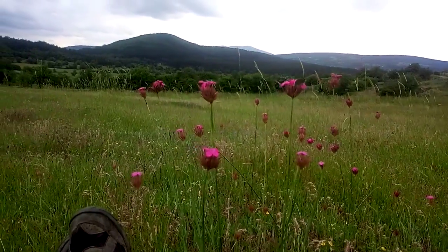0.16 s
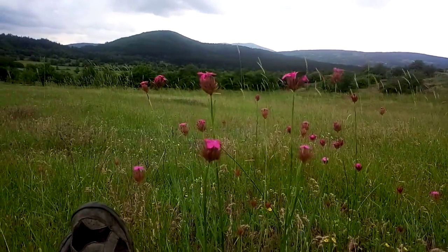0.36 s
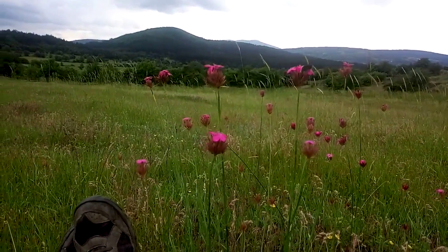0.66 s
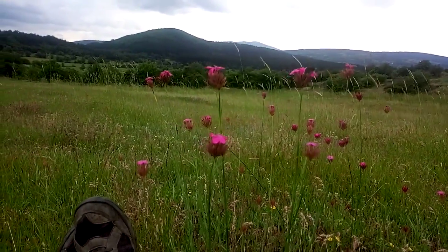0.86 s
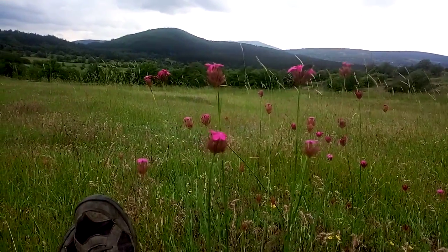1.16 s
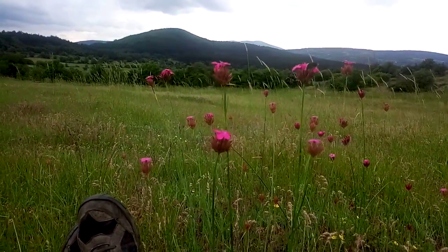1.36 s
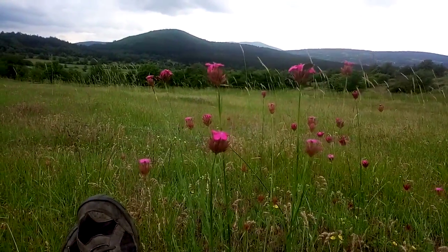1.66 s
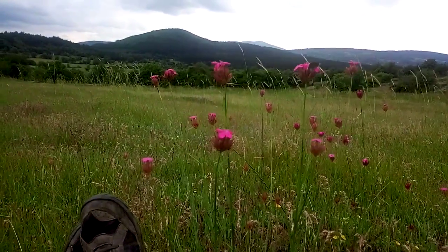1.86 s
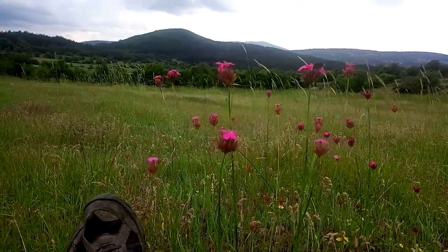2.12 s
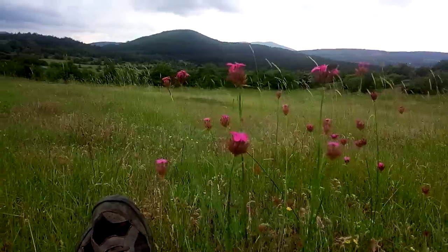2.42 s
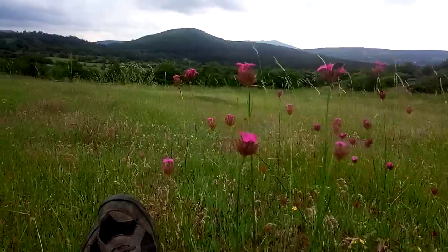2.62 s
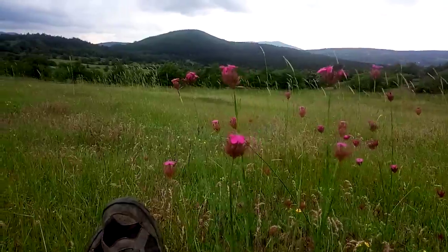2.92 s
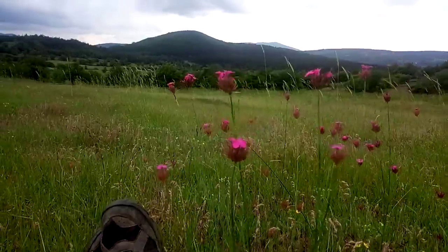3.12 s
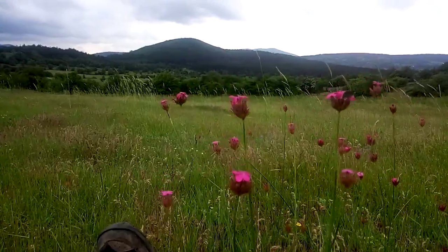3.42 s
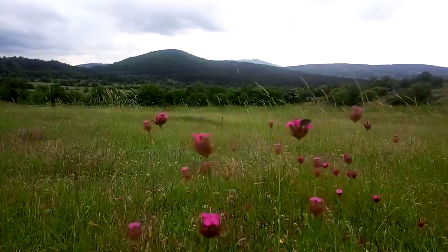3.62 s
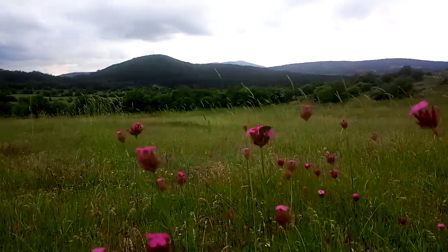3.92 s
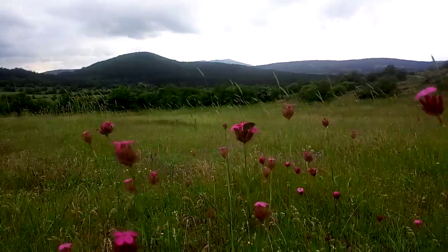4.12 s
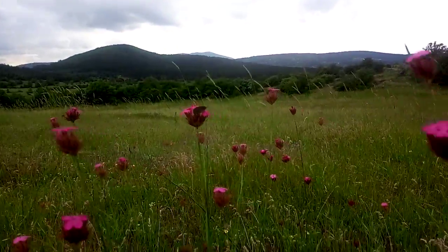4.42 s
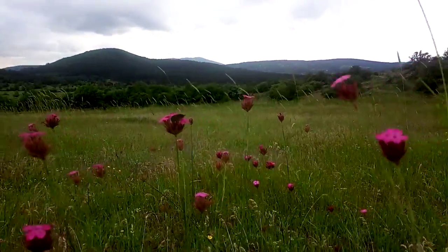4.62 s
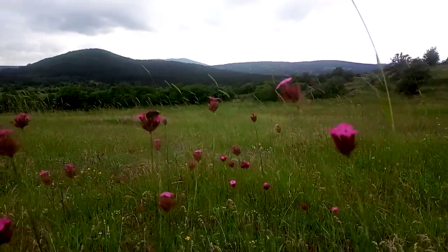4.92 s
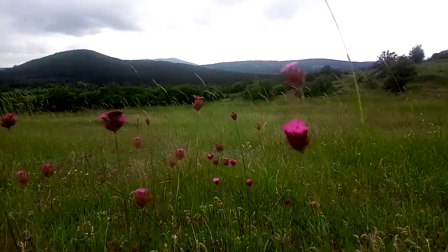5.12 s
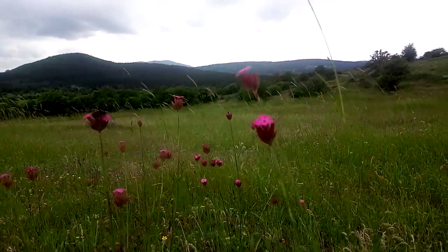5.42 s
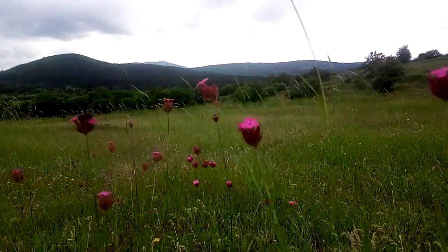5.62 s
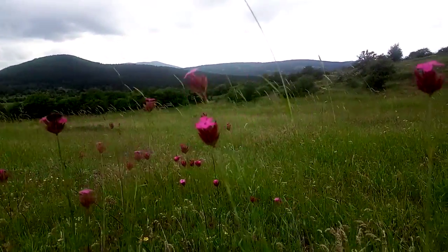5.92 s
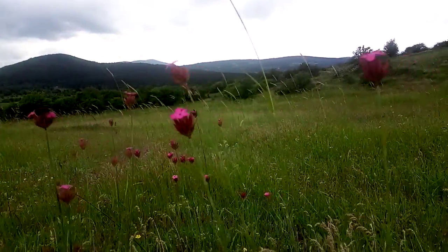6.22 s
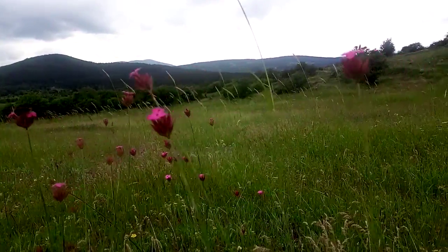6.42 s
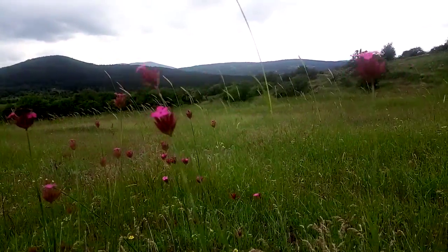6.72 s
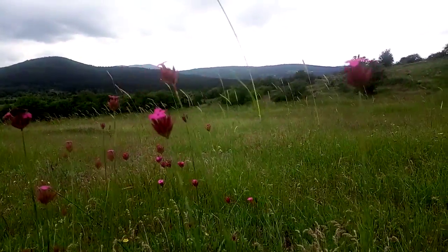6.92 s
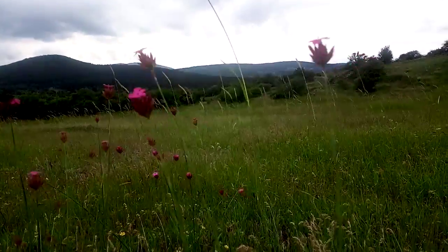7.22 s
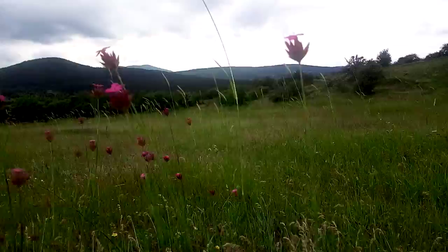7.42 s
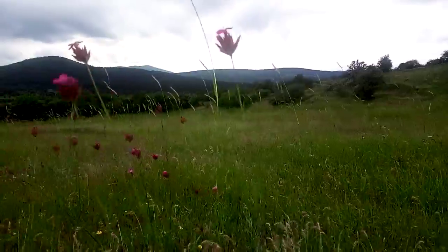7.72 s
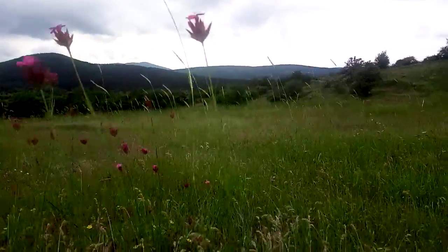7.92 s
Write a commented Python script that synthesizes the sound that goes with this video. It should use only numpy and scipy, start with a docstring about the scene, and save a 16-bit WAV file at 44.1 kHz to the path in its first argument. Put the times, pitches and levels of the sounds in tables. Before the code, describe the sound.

Breezy grassland with crickets throughout, near chirps swelling toward the end. Small birds slide and twitter at varied distances. A bright, buzzing songbird verse comes early and again late, each closing on a lower rattling trill. Between them, deep wind buffets hit the unprotected microphone, with thin high ticks alongside. Later the wind is weaker but grass rustles more. Dry open air, slight scattered echo, faint hiss.

```python
"""A meadow on a breezy day. Crickets pulse near and far throughout: arched tones, one for each wing stroke.
Early on a farther bird calls in level notes and slurs; then a bunting sings its first verse of buzzy rises, dipping
whistles and a trill, all throbbing sines. Gusts of shaped noise rumble on the microphone as a high bird ticks.
After that a near bird calls in quick drops and hooks. Late in the scene the bunting sings a second verse while the
grass, a brighter noise, rustles more. Other birds slide and twitter all along, over a soft hiss."""
import sys
import numpy as np
from scipy import signal
from scipy.io import wavfile
from scipy.ndimage import uniform_filter1d

SR = 44100
rng = np.random.default_rng(int(sys.argv[2]) if len(sys.argv) > 2 else 0)


def persist_wave(psi):
    """Save psi, clipped to +-1, as 16-bit WAV."""
    counts = np.round(np.clip(psi, -1, 1) * 32767).astype(np.int16)
    wavfile.write(sys.argv[1], SR, np.atleast_2d(counts).T)


N = 355446

# bunting, buzzy rising notes: (top t/s, climb t/s, top f/Hz, buzz level/dB, top level/dB)
BUNTING_RISES = [(1.614, .045, 4000, -54, -61), (1.814, 0.047, 3830, -44.5, -36),
                 (2.004, 0.064, 3812, -45.5, -36), (2.198, 0.074, 3810, -46.5, -40),
                 (2.369, 0.065, 3820, -43.5, -38.5), (6.111, 0.05, 3950, -54, -61.5),
                 (6.319, .062, 3870, -44, -36), (6.516, 0.06, 3866, -40, -35.5),
                 (6.709, 0.075, 3846, -46, -43.5), (6.88, 0.063, 3800, -45.5, -39)]
CLIMB_HZ_PER_S = 5700
RISE_ATTACK_S, RISE_ATTACK_DB = .026, -25.5  # time to set in; start against the buzz
SURGE_S, TOP_HOLD_S = 0.025, 0.0038  # the level leaves the buzz this early; top held this long on either side
RISE_DROP_S, RISE_DROP_DB = .018, -13  # time after the top, level against the top
RISE_RELEASE_S, RISE_RELEASE_DB = .034, -18  # the same for the end of the note
# bunting, whistles that drop to the peak and turn up again: (peak t/s, f/Hz, peak level/dB, size of the dip f/Hz)
BUNTING_DIPS = [(1.65, 4250, -56, 93), (1.872, 4450, -41.5, 326), (2.07, 4425, -42.5, 240),
                (2.255, 4410, -46.5, 328), (2.424, 4383, -41.5, 232), (6.165, 4300, -56.5, 60),
                (6.38, 4410, -47.5, 180), (6.575, 4450, -51, 119.6), (6.76, 4450, -55, 149),
                (6.948, 4376, -48, 150)]
# course shared by the dipping whistles: (t/s from peak, share of the dip, level/dB against peak)
DIP_SHAPE = [(-.038, 0.67, -22.5), (-.018, 0.22, -3.5), (0, -0.45, 2.5), (.016, -.25, -3),
             (.032, 0.56, -14)]
# bunting, trills: (start t/s, peak t/s, end t/s, f/Hz, peak level/dB, drift of f/Hz, drift of level/dB)
BUNTING_TRILLS = [(2.49, 2.647, 2.87, 3269, -47.5, 9.2, 0), (6.999, 7.117, 7.32, 3248, -39, 25, 2.3)]
TRILL_ATTACK_S, TRILL_DRIFTS_PER_S = 0.041, 37.6
TRILL_START_DB, TRILL_SWELL_DB, TRILL_FADE_DB = -12, -4, -23  # start, after the attack, end: against the peak
RISE_BUZZ_HZ, TRILL_BUZZ_HZ = 161.8, 119  # the voice throbs this often

# a farther bird of the same kind, a level note and a slur down: (slur t/s, note level/dB, slur level/dB, slur f/Hz)
FAR_ANSWERS = [(.645, -80, -59, 3800), (.9, -83, -64, 3600), (1.206, -63.5, -51.5, 3976),
               (1.496, -54.5, -44, 4040), (1.723, -55.5, -49.5, 4030), (1.94, -54.5, -48.5, 4040)]
# its level note: (t/s from slur, f/Hz, level/dB against the note)
ANSWER_NOTE_SHAPE = [(-.128, 3530, -7), (-.105, 3530, -1), (-.055, 3520, 0), (-.036, 3500, -7)]
# its slur: (t/s from slur, shift f/Hz, level/dB against the slur)
ANSWER_SLUR_SHAPE = [(-.026, 196.5, -7.5), (0, 1.5, -3.5), (.026, -170, -12.5)]
# a near bird, a quick drop and an upward hook: (start t/s, drop level/dB, hook level/dB, shift of hook f/Hz)
NEAR_HOOKS = [(4.25, -43.5, -41, 86), (4.336, -40.5, -40.5, 5), (4.423, -38.5, -41.5, -22)]
# its drop: (t/s from start, f/Hz, level/dB against the drop)
DROP_SHAPE = [(0, 3500, -1), (.005, 2530, -5.5), (.012, 1960, -4)]
# its hook: (t/s from start, f/Hz before the shift, level/dB against the hook)
HOOK_SHAPE = [(.017, 1780, -7.5), (.03, 2296, -1.5), (.045, 2590, 0.5)]
# short arched calls: (top t/s, top f/Hz, level/dB)
ARCHED_CALLS = [(7.47, 2560, -44), (7.577, 2530, -45), (7.685, 2474, -41.5)]
# course of an arched call: (t/s from top, shift f/Hz, level/dB against the call)
ARCH_SHAPE = [(-.014, -670, -8), (-.005, -230, -7.5), (0, 1, 0), (.005, -240, -6.5), (.012, -660, 5)]
# calls heard once, each with a course of its own: (t/s, f/Hz, level/dB)
SOLO_CALLS = [
    [(3.425, 4050, -60), (3.445, 4630, -74), (3.465, 3530, -55.5), (3.49, 3510, -56)],
    [(3.998, 2444, -46), (4.012, 3030, -46.5), (4.024, 4360, -76), (4.034, 2920, -47), (4.048, 1810, -43.5)],
    [(6.89, 2420, -62.5), (6.915, 2894, -55.5), (6.95, 2780, -56), (6.975, 2490, -50), (7.0, 2364, -56.5),
     (7.02, 2430, -57.5)],
    [(7.742, 4390, -52), (7.755, 2770, -62.5), (7.77, 4240, -51), (7.78, 4120, -52), (7.8, 4010, -46)],
]
# single slides of birds all around:
# (start t/s, length t/s, from f/Hz, to f/Hz, bend: under 1 moves early, level/dB)
BIRD_SLIDES = [(.075, 0.023, 2470, 2420, 1.1, -72), (0.151, .018, 2110, 2000, .9, -70),
               (0.403, 0.027, 3820, 2940, 1, -71), (.65, 0.17, 2180, 2120, 1, -82),
               (.67, .02, 3440, 2930, 1.1, -72), (0.779, 0.023, 3160, 3120, 1, -70),
               (1.227, 0.036, 3580, 3080, 1.2, -65.5), (1.617, 0.03, 2260, 2540, 0.38, -72),
               (1.666, 0.034, 3540, 2940, 1.1, -66.5), (1.93, .075, 2860, 2540, .6, -76.5),
               (1.977, 0.058, 2060, 2030, 0.63, -77), (2.054, 0.37, 3310, 3230, 0.97, -68.5),
               (2.408, 0.081, 2650, 2510, 0.48, -69), (2.645, 0.0084, 2060, 2500, 1.1, -61.5),
               (2.88, 0.025, 2800, 2570, 0.51, -68), (3.403, 0.11, 2590, 2380, 0.52, -74),
               (3.709, 0.039, 1920, 2694, 0.794, -49), (3.824, 0.011, 7000, 5030, 1, -62),
               (3.954, 0.011, 7740, 5360, 1.3, -64.5), (4.699, .025, 2350, 1950, 1.2, -70),
               (5.135, 0.018, 4200, 3270, 1.1, -74), (5.612, 0.04, 3200, 4330, 1.3, -79),
               (5.686, 0.027, 3400, 4200, 1.3, -75), (5.707, 0.032, 5430, 5300, 1.1, -63.5),
               (6.4, 0.078, 3320, 3030, 0.44, -67.5), (7.273, .01, 4300, 3620, 1.1, -63),
               (7.379, .23, 3230, 3270, .9, -69), (7.401, .17, 2960, 2980, .9, -71.5),
               (7.41, 0.018, 4400, 3480, 1.1, -81), (7.645, .015, 3850, 3380, 0.95, -68),
               (8.016, .035, 3230, 3100, .9, -81)]
SLIDE_ENDS_DB = -5.5  # how much softer a slide starts and ends
# calls that leap to a sharp peak and trail off: (peak t/s, trail t/s, trail ends at f/Hz, level/dB)
PEAKED_CALLS = [(2.864, 0.038, 2940, -57), (3.227, 0.043, 3070, -55), (3.7, .045, 2930, -65),
                (4.371, 0.075, 2900, -58), (4.796, 0.042, 2900, -55.5), (5.006, 0.035, 2770, -61),
                (5.414, 0.061, 2830, -69), (5.9, .055, 2900, -71)]
# the leap they share: (t/s from peak, f/Hz, level/dB against the call)
LEAP_SHAPE = [(-.032, 2630, -11), (-.014, 2520, -6.5), (-.006, 3380, -9.5), (0, 4400, -13),
              (.006, 3450, -4), (.012, 3220, -2)]
TRAIL_DB = -10.5  # end of the trail against the call
# swoops that slide fast and then settle: (start t/s, length t/s, from f/Hz, to f/Hz, level/dB)
BIRD_SWOOPS = [(.444, 0.08, 2010, 3150, -69.5), (0.937, .1, 2890, 1970, -77.5),
               (0.991, 0.095, 2220, 3400, -67.5), (1.106, 0.051, 2280, 2970, -71.5),
               (1.243, 0.042, 5400, 6170, -74), (7.351, 0.037, 4730, 2930, -55)]
SWOOP_SETTLE = .2  # share of the length in which the distance to the goal shrinks to about a third
SWOOP_END_DB = -7  # fading at the end

# a high thin bird ticking: (t/s, peak level/dB, middle of the slide f/Hz)
HIGH_TICKS = [(2.7352, -58.5, 7050), (2.9215, -54.5, 7290), (3.047, -55.5, 7380), (3.1415, -57.5, 7400),
              (3.218, -61.5, 7400), (3.2455, -59, 7380), (3.271, -61, 7500), (3.2976, -60.5, 7350),
              (3.324, -61, 7180), (3.3536, -62, 7350), (3.3654, -62, 7400), (3.3777, -60, 7260),
              (3.5219, -67, 7260), (3.5448, -67, 7100), (3.5783, -67, 7260), (3.592, -63, 7100),
              (3.6202, -71, 7250), (3.6361, -64, 7150), (3.6845, -70, 7300), (3.697, -66, 7270),
              (3.7194, -71, 7340), (3.7499, -70, 7260), (3.7783, -60.5, 7240), (3.8117, -64, 7300),
              (3.8801, -81, 7580), (3.9055, -73, 7400), (4.0253, -76, 7700), (4.1096, -78, 7590)]
LONE_GAP_S = .07  # a tick counts as lone when the next one is farther off than this
LONE_GLIDE_HZ, RUN_GLIDE_HZ = 600, -400  # lone ticks slide up, ticks in a run slide down
# its lower upward flicks: (t/s, peak level/dB, f/Hz: each starts 700 below and ends 800 above)
HIGH_FLICKS = [(3.2241, -71, 6030), (3.252, -60, 5800), (3.279, -52, 5700), (3.3049, -56, 5800),
               (3.3326, -56, 5700)]
# its lower rattle: (t/s, f/Hz, level/dB)
HIGH_RATTLE = [(3.405, 5340, -69), (3.47, 5330, -65), (3.512, 5330, -68)]
# bursts of rough twitter: (t/s, length t/s, lowest starting f/Hz, spread f/Hz, loudest level/dB before the mix)
CHATTER_BURSTS = [(0.287, 0.044, 3370, 700, -65.5), (0.575, 0.12, 3050, 890, -62.5),
                  (0.849, 0.11, 2940, 1030, -66), (2.629, 0.18, 2110, 614, -63),
                  (3.137, 0.05, 1975, 1020, -62.5), (3.226, 0.16, 5130, 1110, -69),
                  (3.505, 0.28, 5070, 790, -67.5), (3.657, 0.054, 2430, 590, -63),
                  (3.934, 0.17, 1154, 1930, -63), (4.715, 0.045, 1930, 1760, -71),
                  (6.312, 0.061, 1853, 594, -53.5), (3.517, 0.12, 6680, 890, -77.5),
                  (3.873, 0.059, 6850, 700, -77), (3.957, 0.043, 6240, 1000, -82)]
TWITTER_TOP_DB, TWITTER_PER_S = -75, 30  # random distant birds: loudest level before the mix, how often

# chirps of the nearest crickets: (first stroke t/s, last stroke t/s, level/dB, starting f/Hz)
CRICKET_CHIRPS = [(0.015, 0.047, -58, 4800), (.12, .163, -53.5, 4880), (0.464, 0.55, -55, 4840),
                  (.773, 0.86, -53.5, 4650), (0.932, 0.998, -56, 4800), (1.353, 1.488, -51, 4730),
                  (1.931, 2.015, -51, 4800), (2.056, 2.093, -52.5, 5000), (2.25, 2.29, -53, 4640),
                  (2.529, 2.572, -50, 4940), (2.599, 2.683, -50, 4800), (2.898, 2.935, -53.5, 4940),
                  (3.167, 3.208, -50, 4710), (3.241, 3.323, -54, 4830), (3.706, 3.74, -48, 4730),
                  (4.001, 4.13, -53.5, 4770), (4.244, 4.315, -55.5, 4720), (4.452, 4.535, -50.5, 4730),
                  (4.808, 4.963, -53, 4770), (4.839, 4.915, -53.5, 4970), (5.18, 5.228, -53.5, 4850),
                  (5.278, 5.363, -47, 4760), (5.403, 5.48, -54.5, 4880), (5.813, 5.936, -46, 4774),
                  (6.264, 6.354, -45, 4765), (6.662, 6.79, -48, 4780), (7.09, 7.213, -41, 4756),
                  (7.634, 7.771, -45, 4760)]
STROKE_GAP_S, FIRST_STROKE_DB = .044, -7  # rough time between strokes; softening of the first
STROKE_SPREAD_DB, STROKE_SPREAD_HZ = -0.3, 40  # chance differences between strokes
# far crickets together: (t/s, level/dB)
FAR_CRICKETS = [(0.0, -59.5), (0.22, -69), (0.81, -66), (1.21, -68), (2.15, -64), (2.51, -66.5),
                (2.76, -64.5), (4.04, -67.5), (5.81, -65.5), (6.02, -68.5), (6.82, -65), (7.5, -66.5),
                (7.74, -62), (8.06, -67.5)]

# grass in the breeze: (t/s, level/dB)
GRASS_LEVEL = [(0, -82.5), (1.5, -84.5), (2.75, -79), (3.0, -85), (4.05, -72), (4.55, -79.5), (4.7, -79),
               (5.3, -77), (5.45, -73), (6.05, -65.5), (6.17, -72), (6.35, -64), (6.5, -73.5), (6.85, -76),
               (7.22, -65), (7.35, -69), (7.6, -65), (8.06, -69)]
# tone colour of the grass: (f/Hz, relative level/dB per Hz)
GRASS_COLOUR = [(700, -20.5), (1200, -12.5), (1700, -5.5), (2200, 4), (2500, -1.5), (2900, -16), (3800, -9),
                (5400, -5.5), (6500, -31.5), (8000, -43), (9500, -67.5)]
# steady wind on the microphone: (t/s, level/dB)
STEADY_WIND = [(0, -80), (.28, -79), (.45, -62.5), (.62, -62.5), (.67, -84), (.9, -78), (1.38, -72.5),
               (1.43, -85.5), (2.11, -82.5), (2.26, -54.5), (2.65, -52.5), (2.72, -57), (3.02, -52),
               (3.76, -52), (3.84, -60), (4.21, -60), (4.5, -82), (8.06, -80.5)]
# single buffets: (peak t/s, peak level/dB, how fast it swells and dies in dB per s)
WIND_BUFFETS = [(0.34, -58.5, 400), (0.972, -55, 200), (1.131, -60.5, 348), (1.25, -66, 180),
                (2.3, -52, 155), (2.505, -35, 299), (2.538, -30, 597), (3.019, -46.5, 203),
                (3.289, -43.5, 203), (3.371, -38, 504), (3.449, -41.5, 208), (3.646, -33, 445),
                (4.59, -66, 299), (4.789, -56.5, 498), (4.878, -61.5, 450), (4.97, -66, 253),
                (6.439, -61, 153), (6.61, -71.5, 105), (6.89, -64.5, 500), (7.09, -65, 454),
                (7.49, -62.5, 160)]
# tone colour of hard gusts: (f/Hz, relative level/dB per Hz)
HARD_GUST_COLOUR = [(20, -14), (45, -4), (80, 0), (130, 0), (165, -6), (210, -17), (310, -23), (480, -40),
                    (900, -50), (1500, -90)]
# tone colour of light puffs: (f/Hz, relative level/dB per Hz)
LIGHT_PUFF_COLOUR = [(12, -48), (20, -10), (49, 5.5), (92, 1.5), (188, -26.5), (250, -17.5), (320, -55.5),
                     (550, -120)]
# tone colour of still air and microphone hiss: (f/Hz, relative level/dB per Hz)
AIR_COLOUR = [(20, -18.5), (107, -7), (300, -12.5), (825, -18.5), (1570, -21.5), (3950, -19.5),
              (5530, -23.5), (7200, -29), (8180, -37), (13500, -37), (14700, -30.5), (16000, -23.5)]
AIR_DB = -73
BAND_EDGE_HZ = 15750


def bunting():
    """Buzzy rises that clear at the top, plainer dipping whistles, and trills whose throb gives them side tones."""
    out = np.zeros(N)
    for row in BUNTING_RISES:
        add(out, *note(rise(*row), RISE_BUZZ_HZ, depth=0.79, fade=1.6, waver_hz=27.6, rasp=.08))
    for s, hz, db, dip_hz in BUNTING_DIPS:
        course = np.multiply(DIP_SHAPE, [1, dip_hz, 1])
        add(out, *note(placed(course, s, hz, db), RISE_BUZZ_HZ, depth=0.13))
    for row in BUNTING_TRILLS:
        add(out, *note(trill(*row), TRILL_BUZZ_HZ, depth=.42, overtones=(.09, .2), swing=.25,
                       waver_hz=9., flicker_db=1.8, rasp=.19))
    return out


def rise(top, climb, hz, buzz_db, top_db):
    """Climbs steadily while buzzing, moves to the level of the top, holds it briefly and dies there."""
    # sorted, because in a short climb the attack can end after the surge begins
    s = np.sort([-climb, RISE_ATTACK_S - climb, -SURGE_S, -TOP_HOLD_S, TOP_HOLD_S, RISE_DROP_S, RISE_RELEASE_S])
    db = [buzz_db + RISE_ATTACK_DB, buzz_db, buzz_db, top_db, top_db,
          top_db + RISE_DROP_DB, top_db + RISE_RELEASE_DB]
    return np.transpose([top + s, hz + CLIMB_HZ_PER_S * np.minimum(s, 0), db])


def trill(start, peak, end, hz, db, drift_hz, drift_db):
    """Sets in quickly, swells to the peak and fades ever faster; pitch and level drift on the way."""
    t = np.arange(start, end, 1 / SR)
    swell = np.interp(t, [start, start + TRILL_ATTACK_S, peak], [TRILL_START_DB, TRILL_SWELL_DB, 0])
    fade = TRILL_FADE_DB * (np.maximum(t - peak, 0) / (end - peak)) ** 1.6
    pitch_drift = drift_hz * wander(len(t), TRILL_DRIFTS_PER_S)
    level_drift = drift_db * wander(len(t), TRILL_DRIFTS_PER_S)
    return np.transpose([t, hz + pitch_drift, db + swell + fade + level_drift])


def small_birds(calls):
    """Whistles of birds all around: near sines that follow the course of each call."""
    out = np.zeros(N)
    for rows in calls:
        loudest_db = max(row[2] for row in rows)
        far = np.clip((-48 - loudest_db) / 15, 0, 1)  # faint birds are far and waver more in pitch
        # the sign of the flicker does not matter: it is weakest for birds halfway off
        add(out, *note(rows, depth=0.16, waver_hz=20 + 30 * far, flicker_db=-1.16 + 2.0 * far))
    return out


def whistles():
    """The (t/s, f/Hz, level/dB) course of each solo, slide, arch, drop, hook and answer."""
    calls = SOLO_CALLS + [slide(*row) for row in BIRD_SLIDES]
    calls += [placed(ARCH_SHAPE, s, hz, db) for s, hz, db in ARCHED_CALLS]
    for s, drop_db, hook_db, hz in NEAR_HOOKS:
        calls += [placed(DROP_SHAPE, s, 0, drop_db), placed(HOOK_SHAPE, s, hz, hook_db)]
    for s, note_db, slur_db, hz in FAR_ANSWERS:
        calls += [placed(ANSWER_NOTE_SHAPE, s, 0, note_db), placed(ANSWER_SLUR_SHAPE, s, hz, slur_db)]
    return calls


def slide(start, length, from_hz, to_hz, bend, db):
    """One glide under an arch of loudness."""
    u = np.linspace(0, 1, num=24)
    hz = from_hz + (to_hz - from_hz) * u ** bend
    return np.transpose([start + length * u, hz, db + SLIDE_ENDS_DB * (2 * u - 1) ** 2])


def peaked_calls():
    """One leap shared by all, then a trail of its own length."""
    return [placed(LEAP_SHAPE + [(trail, hz, TRAIL_DB)], s, 0, db) for s, trail, hz, db in PEAKED_CALLS]


def swoop(start, length, from_hz, to_hz, db):
    """The pitch closes in on its goal ever more slowly."""
    u = np.linspace(0, 1, num=24)
    hz = to_hz + (from_hz - to_hz) * np.exp(-u / SWOOP_SETTLE)
    return np.transpose([start + length * u, hz, db + SWOOP_END_DB * u ** 2])


def high_bird():
    """Thin ticks and upward flicks, each a tiny sliding tone, and a rattle with a deep throb."""
    out = np.zeros(N)
    gaps = np.diff(np.transpose(HIGH_TICKS)[0], append=np.inf)
    for (s, db, hz), gap in zip(HIGH_TICKS, gaps):
        glide_hz = LONE_GLIDE_HZ if gap > LONE_GAP_S else RUN_GLIDE_HZ
        add(out, s - .003, gain_of(db) * chirp(hz - glide_hz / 2, glide_hz, 0.82, 0.0092))
    for s, db, hz in HIGH_FLICKS:
        add(out, s - .003, gain_of(db) * chirp(hz - 700, 1500, 2.7, 0.0077))
    add(out, *note(HIGH_RATTLE, 97., depth=.95, waver_hz=60., flicker_db=2.5))
    return out


def crickets():
    """Each wing stroke is a tone that sags as the scraper slows; far crickets overlap at random."""
    near, far = np.zeros(N), np.zeros(N)
    chances = rng.standard_normal((len(CRICKET_CHIRPS), 6, 2))
    for (first, last, db, hz), chance in zip(CRICKET_CHIRPS, chances):
        times = np.linspace(first, last, round((last - first) / STROKE_GAP_S) + 1)
        for k, (s, (louder, higher)) in enumerate(zip(times, chance)):
            # a chirp starts softly
            level_db = db + FIRST_STROKE_DB * 0.19 ** k + STROKE_SPREAD_DB * louder
            add(near, s, gain_of(level_db) * chirp(hz + STROKE_SPREAD_HZ * higher, -400, 2.8, .027))
    for hz in np.linspace(4620, 5020, num=9):  # nine far crickets
        strokes_per_s = 20.0 + 3.5 * wander(N, 8)
        # one click each time the running count of strokes passes a whole number
        clicks = np.diff(np.floor(np.cumsum(strokes_per_s) / SR + rng.random()), prepend=0)
        far += signal.oaconvolve(clicks * gain_of(4.5 * wander(N, 8)), chirp(hz, -370, 2.4, .026))[:N]
    return near + evened(far) * along(FAR_CRICKETS)


def twitter():
    """Distant birds: bursts of quick overlapping slides, and faint single ones at random."""
    out = np.zeros(N)
    for s, length, low_hz, spread_hz, db in CHATTER_BURSTS:
        for at, pitch, glide, size in rng.random((60, 4))[:round(150 * length)]:
            tone = chirp(low_hz + spread_hz * pitch, 900 * (glide - .4), 0.63, 0.011)
            add(out, s + length * at, gain_of(db + 8 * (size - 1.0)) * tone)
    for at, pitch, glide, size, length in rng.random((round(TWITTER_PER_S * N / SR), 5)):
        tone = chirp(1900 + 2300 * pitch, 1400 * (glide - .6), 1.6, 0.013 + 0.023 * length)
        add(out, at * N / SR, gain_of(TWITTER_TOP_DB - 39 * size) * tone)
    return out


def grass():
    """Rustling blades: coloured noise that flutters and follows the breeze."""
    return noise(GRASS_COLOUR, patchy_db=1.5) * gain_of(1.2 * wander(N, 60)) * along(GRASS_LEVEL)


def wind():
    """Lumpy pressure on the microphone; hard gusts are higher, overdrive it and reach further up."""
    strength_db = wind_db()
    hard = np.clip((strength_db + 59) / 20, 0, 1)
    blend = np.sqrt(hard) * noise(HARD_GUST_COLOUR, patchy_db=1.5)
    blend += np.sqrt(1 - hard) * noise(LIGHT_PUFF_COLOUR, patchy_db=1.6)
    # even out the noise, so that its level follows the strength of the gust from moment to moment
    steady = blend / np.sqrt(uniform_filter1d(blend ** 2, size=1200) + 0.09)
    push = evened(steady * gain_of(1.6 * wander(N, 50))) * gain_of(strength_db)
    high_pass = signal.butter(2, 220, "high", fs=SR, output="sos")
    overdrive = signal.sosfilt(high_pass, push * abs(push))  # grows faster than the push itself
    return push + overdrive


def wind_db():
    """Strength of the wind at every sample: the steady push, or a buffet where that is stronger."""
    t = np.arange(N) / SR
    level = np.interp(t, *np.transpose(STEADY_WIND))
    for s, db, slope in WIND_BUFFETS:
        level = np.maximum(level, db - slope * abs(t - s))
    return level


def air():
    """Still air and microphone hiss: a soft, slightly patchy noise."""
    return gain_of(AIR_DB) * noise(AIR_COLOUR, patchy_db=1.97)


def meadow(x, t60):
    """Scattered echoes from grass, bushes and slopes: noise that dies by 60 dB in t60 seconds."""
    t = np.arange(int(.6 * SR)) / SR
    tail = rng.standard_normal(len(t)) * gain_of(-60 * t / t60) * (t > .004)
    return signal.oaconvolve(x, tail / np.linalg.norm(tail))[:N]


def note(rows, buzz_hz=100., depth=0., fade=0., overtones=(0., 0.), swing=0., waver_hz=12.,
         flicker_db=1., rasp=.04):
    """A near sine whose loudness and phase throb at buzz_hz; moving air makes it flicker."""
    s, hz, db = np.transpose(rows)
    t = np.arange(s[0], s[-1], 1 / SR)
    length = s[-1] - s[0]
    turns = np.cumsum(np.interp(t, s, hz) + waver_hz * wander(len(t), 190)) / SR
    beat = 2 * np.pi * (np.cumsum(buzz_hz * (1 + .03 * wander(len(t), 40))) / SR + rng.random())
    strength = np.clip(1 - fade * ((t - s[0]) / length) ** 2, 0, 1)
    throb_wave = depth * np.cos(beat) + overtones[0] * np.cos(2 * beat) + overtones[1] * np.cos(3 * beat)
    throb = 1 + strength * throb_wave
    throb += rasp * wander(len(t), 900)  # breath noise spreads around the tone
    edges = signal.windows.tukey(len(t), np.clip(0.019 / length, 0, 1))
    level = gain_of(np.interp(t, s, db) + flicker_db * wander(len(t), 170))
    # a phase swing against the throb makes the lower side tone the stronger one
    tone = np.sin(2 * np.pi * turns - swing * np.sin(beat))
    return s[0], np.sqrt(2) * level * throb * edges * tone


def chirp(hz, glide_hz, bend, length):
    """One short arch of tone whose pitch slides by glide_hz, late if bend is large."""
    u = np.linspace(0, 1, int(length * SR))
    return np.sin(np.pi * u) * np.sin(2 * np.pi * np.cumsum(hz + glide_hz * u ** bend) / SR)


def noise(colour, patchy_db):
    """Random short-time spectra with drifting louder and softer patches."""
    frames, hz = N // 256 + 5, np.fft.rfftfreq(1024, 1 / SR)
    real, imaginary, patches = rng.standard_normal((frames, 513, 3)).T
    patches = uniform_filter1d(patches, size=12, axis=0)  # smooth over pitch
    patches = evened(uniform_filter1d(patches, size=10, axis=1))  # smooth over time
    f, db = np.transpose(colour)
    colour_db = np.interp(np.log(hz + 1), np.log(f), db)[:, None]
    spectra = (real + 1j * imaginary) * gain_of(colour_db + patchy_db * patches)
    return evened(signal.istft(spectra, nperseg=1024, noverlap=768)[1][:N])


def wander(count, hz):
    """Smooth chance of rms 1 that changes about hz times a second."""
    width = int(SR / hz)
    return evened(uniform_filter1d(uniform_filter1d(rng.standard_normal(count), width), width))


def placed(shape, s, hz, db):
    """A shared (t/s, f/Hz, level/dB) shape moved to its time, pitch and level."""
    return np.array(shape) + [s, hz, db]


def along(curve):
    """A (t/s, level/dB) curve as a gain for every sample."""
    return gain_of(np.interp(np.arange(N) / SR, *np.transpose(curve)))


def add(mix, s, sound):
    """Mixes a sound in at time s."""
    part = mix[round(s * SR):][:len(sound)]
    part += sound[:len(part)]


def evened(x):
    """Scales to rms 1."""
    return x / np.sqrt(np.mean(x ** 2) + 1e-20)


def gain_of(db):
    """Decibels to amplitude."""
    return 10 ** (np.asarray(db) / 20)


def scene():
    """All voices with their echoes over grass, wind and air; far birds arrive mostly as echo."""
    singer = bunting()
    mix = singer + gain_of(-14) * meadow(singer, t60=.4)
    others = small_birds(whistles())
    mix += others + gain_of(-13) * meadow(others, t60=.33)
    peaked = small_birds(peaked_calls() + [swoop(*row) for row in BIRD_SWOOPS])
    mix += peaked + gain_of(-7.5) * meadow(peaked, t60=0.26)
    high = high_bird()
    mix += high + gain_of(-12) * meadow(high, t60=.15)
    insects = crickets()
    mix += insects + gain_of(-8) * meadow(insects, t60=.2)
    far = twitter()
    mix += gain_of(-3.5) * far + gain_of(-0.5) * meadow(far, t60=0.24)
    return (mix + grass() + wind() + air())[None]


def record(dry):
    """The microphone loses the deepest bass; then the band limit of the recorder."""
    thin = signal.sosfilt(signal.butter(2, 42, "high", fs=SR, output="sos"), dry)
    band_limit = signal.firwin(1023, BAND_EDGE_HZ, window=("kaiser", 9), fs=SR)
    return signal.oaconvolve(thin, band_limit[None], "same")


dry = scene()
out = record(dry)
persist_wave(out)
```